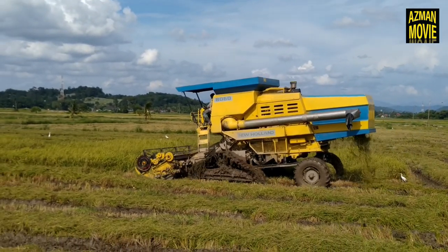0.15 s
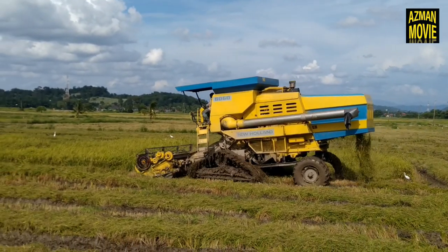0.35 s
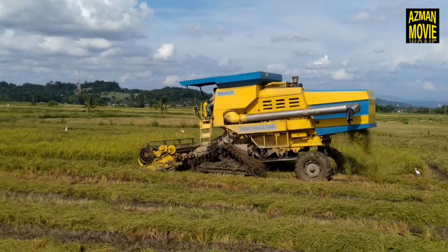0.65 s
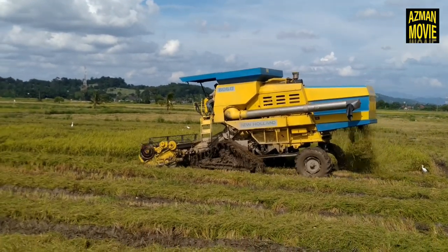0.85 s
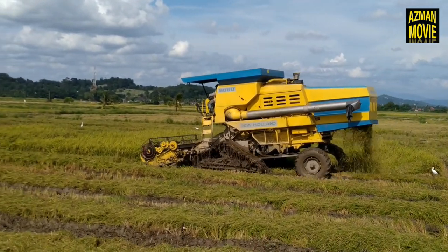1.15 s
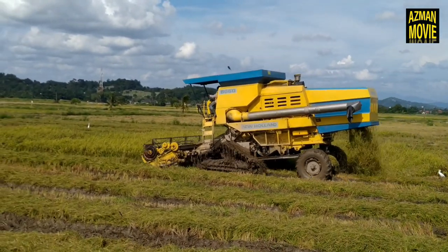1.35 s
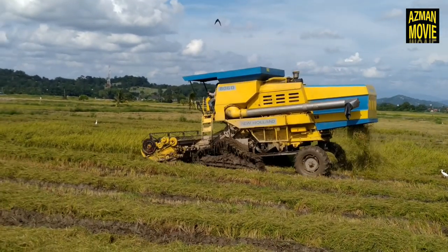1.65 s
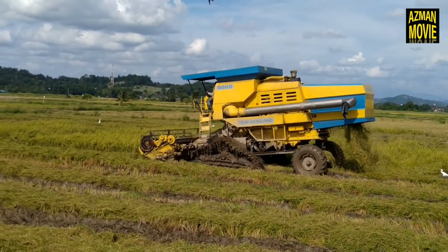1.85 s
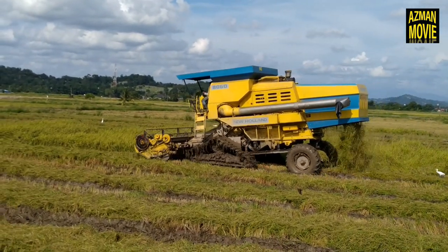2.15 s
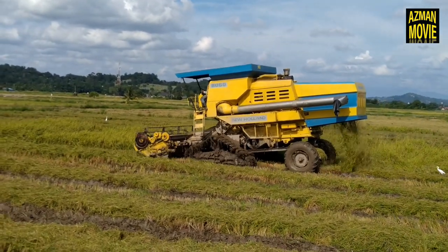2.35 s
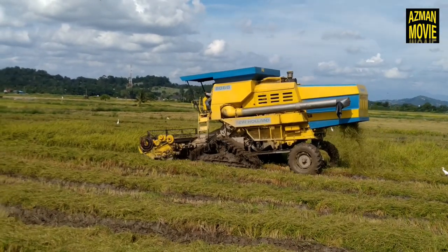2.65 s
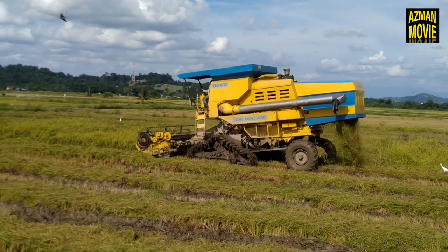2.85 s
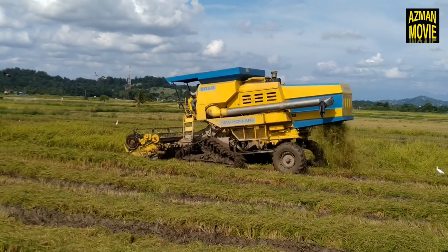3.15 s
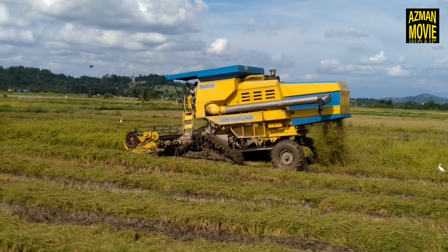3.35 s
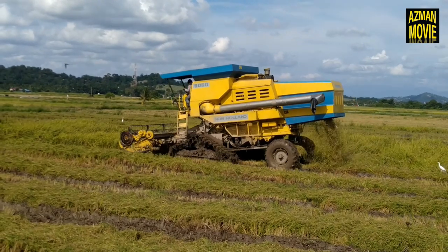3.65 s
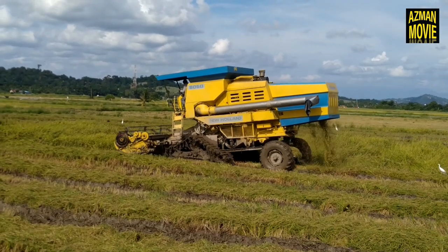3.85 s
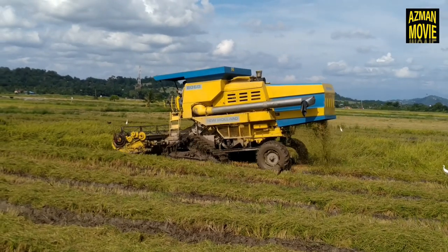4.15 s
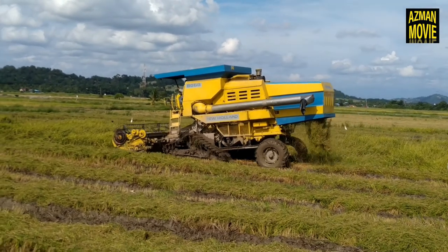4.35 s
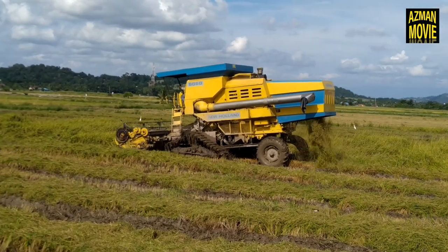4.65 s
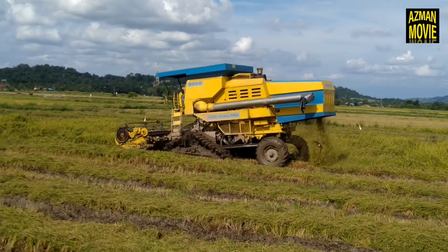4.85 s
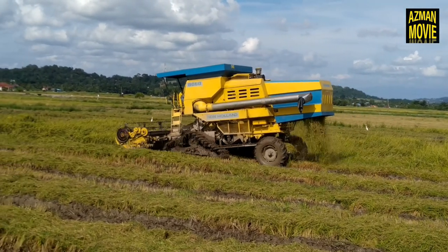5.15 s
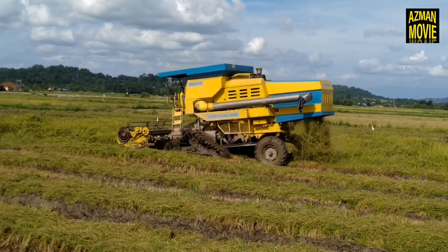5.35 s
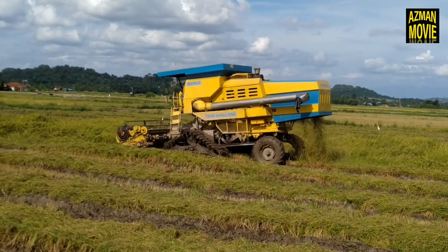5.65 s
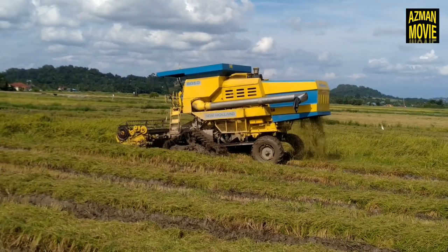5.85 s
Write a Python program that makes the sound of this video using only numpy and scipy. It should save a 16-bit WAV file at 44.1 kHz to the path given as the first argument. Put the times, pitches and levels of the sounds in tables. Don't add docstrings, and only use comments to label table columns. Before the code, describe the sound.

Continuous loaded diesel drone from a combine harvester, heard at medium distance with no walls around. Rapid firing knocks ring metal panels and blend with a rough mid-low roar that swells slightly early on, then eases. Fine, dry chaff hiss flickers on top. Low wind thumps brush the stereo microphone, with a short bump around four seconds and gusts after five.

```python
import sys
import numpy as np
from scipy import signal
from scipy.fft import rfft, irfft
from scipy.io import wavfile

SR = 44100
rng = np.random.default_rng(int(sys.argv[2]) if len(sys.argv) > 2 else 0)


def natural_amplitude(level_db):
    exponent = np.asarray(level_db, float) / 20
    return 10 ** exponent


def materialize(psi):
    bounded = np.clip(np.atleast_2d(psi).T, -1, 1)
    quanta = np.round(bounded * 32767).astype(np.int16)
    wavfile.write(sys.argv[1], SR, quanta)


N = 264600
TIME = np.arange(N) / SR
BINS_HZ = np.maximum(np.fft.rfftfreq(N, 1 / SR), 1)

VIEW_S = [.8, 2.5, 4.6]


def rms_one(x):
    return x / np.sqrt(np.mean(x ** 2) + 1e-20)


def in_time(rows):
    s, *columns = np.transpose(rows)
    return [np.interp(TIME, s, column) for column in columns]


def at_hz(points, hz):
    table_hz, value = np.transpose(points)
    return np.interp(np.log(hz), np.log(table_hz), value)


def drift(rate_hz):
    step = 40
    r = np.exp(-2 * step * np.pi * rate_hz / SR)
    white = rng.standard_normal(N // step + 2002)
    slow = signal.lfilter([1], [1, -2 * r, r * r], white)[2000:]
    return np.interp(np.arange(N) / step, np.arange(len(slow)), rms_one(slow - slow.mean()))


def swells(peaks, floor_db):
    power = natural_amplitude(2 * floor_db)
    for s, db, rise_s, fall_s in peaks:
        width_s = np.where(TIME < s, rise_s, fall_s)
        power = power + natural_amplitude(2 * db) * np.exp(-((TIME - s) / width_s) ** 2)
    return 10 * np.log10(power)


def resonance(x, hz, width_hz):
    r = np.exp(-np.pi * width_hz / SR)
    zeros = np.array([1, 0, -1]) * (1 - r * r) / 2
    poles = [1, -2 * r * np.cos(2 * np.pi * hz / SR), r * r]
    return signal.lfilter(zeros, poles, x)


def bands(x, spectrum, low_hz, high_hz, gain_db_at):
    coloured = rfft(x) * natural_amplitude(at_hz(spectrum, BINS_HZ))
    out = 0
    for hz in low_hz * 2 ** np.arange(0, np.log2(high_hz / low_hz), .5):
        window = np.cos(np.pi * np.clip(np.log2(BINS_HZ / hz), -.5, .5)) ** 2
        out = out + irfft(coloured * window, N) * natural_amplitude(gain_db_at(hz))
    return out


def ports(pair):
    # (frequency [Hz], level [dB])
    port_side = [(60, -28), (110, -22), (200, -18.5), (380, -23.5), (700, -18), (1290, -7), (2380, -7),
                 (4400, -2), (8120, 1.5), (15000, 1.5)]
    # (frequency [Hz], level difference [dB])
    port_balance = [(60, 1.5), (110, 1.0), (200, 2), (380, 0), (700, 2), (1290, -4.5), (2380, 1.5),
                    (4400, 2.5), (8120, 2.5), (15000, 10)]
    # (frequency [Hz], share [0-1])
    diffuse = [(60, .3), (300, .3), (1000, 0.55), (2500, 0.6), (5000, 0.7), (9000, .8), (15000, .9)]
    direct, scattered = rfft(pair)
    in_step = np.tanh(at_hz(port_balance, BINS_HZ) * np.log(10) / 40)
    side_power = natural_amplitude(2 * at_hz(port_side, BINS_HZ))
    rest = np.sqrt(np.maximum(side_power - in_step ** 2, 0))
    share = np.clip(at_hz(diffuse, BINS_HZ), 0, 1)
    side = (in_step + 1j * rest * np.sqrt(1 - share)) * direct + rest * np.sqrt(share) * scattered
    return irfft([direct + side, direct - side], N)


def ground_echo(x):
    # (time [s], lag [ms])
    echo_ms = [(0, 2.1), (2.5, 1.977), (6, 1.886)]
    lag_s = in_time(echo_ms)[0] / 1000
    band = signal.butter(1, [700, 3200], "band", fs=SR, output="sos")
    dull = signal.sosfiltfilt(band, x)
    return x - .5 * np.array([np.interp(TIME - lag_s, TIME, row) for row in dull])


def wind():
    # (peak time [s], peak level [dB], half length [s])
    gusts = [(.2, -41, .25), (.8, -44, .4), (1.2, -36, .08), (1.52, -37, .2), (2.0, -47, .3),
             (2.77, -45, .12), (3.13, -39, .09), (3.5, -42, .2), (4.06, -37.5, .1), (4.35, -45, .2),
             (4.72, -33, .13), (4.93, -33, .1), (5.15, -27, .14), (5.55, -40, .15), (5.71, -32, .07),
             (6.0, -29, .15)]
    # (time [s], peak level [dB], frequency [Hz])
    thumps = [
        (4.008, -19, 90),
        (4.092, -12, 150),
    ]
    calm_db, gust_dulling = -51, .6
    level_db = swells([(s, db, half_s, half_s) for s, db, half_s in gusts], calm_db)
    bright_db = -gust_dulling * (level_db - calm_db)
    white = rng.standard_normal((2, 2, N))
    low_band = signal.butter(2, [45, 120], "band", fs=SR, output="sos")
    high_band = signal.butter(2, [125, 240], "band", fs=SR, output="sos")
    low = rms_one(signal.sosfilt(low_band, white[0]))
    high = rms_one(signal.sosfilt(high_band, white[1]))
    lumps_db = 2.5 * np.array([drift(14), drift(14)])
    out = natural_amplitude(level_db + 4 + lumps_db) * (low + natural_amplitude(bright_db - 3) * high)
    for s, peak_db, hz in thumps:
        turns = (TIME - s) * hz
        out[0] += natural_amplitude(peak_db) * np.exp(-(turns / .4) ** 2) * np.sin(2 * np.pi * turns)
    return out


def grains(per_s, spread_db):
    size_db = spread_db * np.minimum(rng.exponential(1, (2, N)), 5)
    sizes = natural_amplitude(size_db) * rng.choice([-1, 1], (2, N))
    return rms_one(sizes * (rng.random((2, N)) < per_s / SR))


def chaff(gate):
    # (time [s], level [dB])
    stream = [(0, -46.5), (.7, -44.5), (1.2, -45), (1.55, -41), (1.85, -44.5), (2.1, -42.5), (2.5, -46.5),
              (3.3, -45.5), (4.5, -47), (5.0, -43.5), (5.5, -47), (6, -45)]
    # (time [s], peak level [dB])
    wads = [(0.0, -46), (.08, -51), (.15, -46), (.32, -46), (.47, -44), (.62, -43), (.77, -40.5),
            (.93, -44), (1.1, -51), (1.25, -40.5), (1.49, -50), (1.67, -43), (2.0, -42), (2.17, -46),
            (2.23, -44), (2.54, -48), (3.03, -47), (3.36, -48), (3.46, -46), (3.68, -47), (3.83, -50),
            (4.13, -40.5), (4.33, -45), (4.47, -50), (4.66, -48), (4.86, -45), (5.06, -41), (5.16, -46),
            (5.46, -44), (5.83, -47)]
    # (frequency [Hz], density [dB per Hz])
    chaff_colour = [(1500, -27), (3000, 5.5), (6000, -3), (9000, -5.5), (11200, 3.5), (13000, 0),
                    (16000, -6)]
    wad_rise_s, wad_fall_s = 0.027, 0.026
    knock = 0.27
    fine_follows = -0.21
    stream_db, = in_time(stream)
    level_db = swells([(s, db, wad_rise_s, wad_fall_s) for s, db in wads], stream_db)
    grains_per_s = 1500 * natural_amplitude(3 * drift(20))
    rustle = rng.standard_normal((2, N)) + .6 * grains(grains_per_s, spread_db=3.0)
    clump = drift(25)
    top_db = fine_follows * (stream_db - stream_db.mean())

    def moving_db(hz):
        return .8 * clump + .4 * drift(20) + top_db * (hz > 12000)

    noise = bands(rustle * (1 + knock * gate), chaff_colour, 1300, 20000, moving_db)
    return natural_amplitude(level_db + 0.5) * ports(rms_one(noise))


def roar(gate, lope_db):
    # (frequency [Hz], density [dB per Hz])
    roar_colour = [(25, -56), (42, -9), (52, -7), (70, 3), (110, -3), (170, -3), (300, -2.5), (380, -8),
                   (440, -17.5), (900, -16), (1500, -20.5), (2100, -28.5), (3300, -29.5), (4400, -42),
                   (7000, -45.5)]
    # (time [s], level [dB])
    crop_load = [(0.0, -32), (.6, -28.5), (1.2, -29), (1.8, -27), (2.3, -28.5), (2.8, -31), (4.0, -31),
                 (5.2, -31.5), (6.0, -30.5)]
    load_dulling = 1.24
    knock_low, knock_high = .5, .7
    level_db, = in_time(crop_load)
    treble_db = -load_dulling * level_db
    tilt_db = treble_db - treble_db.mean() + 0.95 * drift(5)

    def moving_db(hz):
        bright = np.clip(np.log2(hz / 700) / 2, 0, 1)
        knock = knock_low + (knock_high - knock_low) * bright
        gated_db = (20 * np.log10(1 + knock * gate) + lope_db) * (hz > 400)
        return bright * tilt_db + 0.65 * drift(4.5) + gated_db

    noise = rms_one(bands(rng.standard_normal((2, N)), roar_colour, 28, 11000, moving_db))
    return natural_amplitude(level_db + 2.5) * ports(ground_echo(noise))


def firing_gate(cycle):
    cylinder_db = [2, -1.5, 2.5, -5, -2, 0]
    rise, die, scatter_db = 0.097, 0.44, 1.5
    turns = 6 * (cycle + .9)
    shot = turns.astype(int)
    chance_db = scatter_db * rng.standard_normal(N // 100)[shot]
    strength_db = np.array(cylinder_db)[shot % 6] + chance_db
    since = turns - shot
    return rms_one(natural_amplitude(strength_db) * (1 - np.exp(-since / rise)) * np.exp(-since / die))


def body(gate, far_gate, lope_db):
    # (frequency [Hz], width [Hz], level at start, middle, end [dB], left-right [dB])
    panels = [(374, 33, -40, -40.5, -37.5, 3), (592, 105, -35.5, -36.5, -39, -4),
              (782, 195, -35, -37, -40, -2), (881, 120, -51, -49, -47, 3), (1144, 46, -38, -42.5, -63, 3),
              (1216, 124, -46, -41, -36.5, 0), (1406, 62, -38.5, -35.5, -44, -1.5),
              (1546, 176, -45, -40, -79, 10), (1770, 59, -52, -43.5, -38, 4), (1855, 58, -54, -55, -58, 37),
              (1940, 40, -56, -43, -51, -1), (2257, 156, -39.5, -39, -38.5, -1),
              (2727, 220, -49, -44, -64, 4), (3014, 130, -61, -102, -48, -5),
              (3350, 260, -52, -53, -79, -17), (3638, 147, -47.5, -50.5, -44.5, -2.5),
              (4960, 270, -60, -55.5, -52.5, 1)]
    small_panel_hz = 2000
    knock, blow_share = 1.6, 0.47
    noise = rng.standard_normal((2, N))

    def drive(firing):
        blow = rms_one(np.gradient(np.gradient(firing))) * [[1], [0]]
        return ports(noise * (1 + knock * firing) + blow_share * blow)

    near, far = drive(gate), drive(far_gate)
    out = 0
    for hz, width_hz, *angle_db, pan_db in panels:
        struck = near if hz > small_panel_hz else far
        once = resonance(struck, hz, 1.46 * width_hz)
        ring = rms_one(resonance(once, hz, 1.46 * width_hz))
        level_db = np.interp(TIME, VIEW_S, angle_db) + lope_db + 0.52 * drift(1.6) + 0.7 * drift(24)
        out = out + natural_amplitude(level_db) * ring * natural_amplitude([[pan_db / 2], [-pan_db / 2]])
    return out


def exhaust(cycle):
    # (multiple of the cycle, rms level at start, middle, end [dB])
    main_orders = [(3, -29.8, -30.5, -32.5), (6, -25.2, -21.6, -19.9), (9, -23.6, -23.6, -26)]
    mouth_s = [1.0, 2.5, 3.4]
    # (multiple of the cycle, rms level at start, middle, end [dB])
    weak_orders = [(2, -44, -45, -44), (4, -39, -40, -41), (5, -47, -53, -44), (8, -35, -37, -38),
                   (10, -28, -30, -29), (11, -42, -45, -49), (12, -33, -34, -35), (13, -35, -36, -36),
                   (15, -34, -36, -39), (16, -49, -49, -49), (17, -42, -41, -41), (18, -53, -52, -49),
                   (21, -53, -50, -52), (24, -52, -50, -50), (27, -48, -45, -46), (28, -52, -46, -48),
                   (35, -52, -51, -52)]
    wobble_db, wobble_rad = .6, .08
    orders = [(order, np.interp(TIME, mouth_s, angle_db)) for order, *angle_db in main_orders]
    orders += [(order, np.interp(TIME, VIEW_S, angle_db)) for order, *angle_db in weak_orders]
    out = 0
    for order, db in orders:
        shaky = (order / 9) ** 1.3
        pipe_rad = 5.86 * order - .049 * order ** 2 - .4
        pipe_rad -= 1.2 * (order == 10) + 2.5 * (order in (12, 13))
        phase = 2 * np.pi * order * cycle + pipe_rad + wobble_rad * shaky * drift(4.1)
        level_db = db + wobble_db * shaky * drift(6.8)
        out = out + np.sqrt(2) * natural_amplitude(level_db) * np.sin(phase)
    return out


def scene():
    # (time [s], four-stroke cycle rate [Hz])
    engine = [(0.0, 22.06), (1.0, 22.01), (1.5, 21.9), (2.0, 21.85), (2.5, 21.95), (3.0, 21.85),
              (4.0, 21.86), (4.5, 21.93), (5.0, 21.87), (5.5, 21.98), (6.0, 22.01)]
    far_bank_lag_s = 1 / 65.8
    cycle_hz, = in_time(engine)
    cycle = np.cumsum(cycle_hz * (1 + .0006 * drift(3))) / SR
    gate = firing_gate(cycle)
    far_gate = np.roll(gate, int(far_bank_lag_s * SR))
    lope_db = 1.4 * np.cos(2 * np.pi * (cycle - .98))
    machine = chaff(far_gate) + roar(far_gate, lope_db) + body(gate, far_gate, lope_db)
    hum = ports(exhaust(cycle) * [[1], [0]])
    return wind() + machine + hum


def top_cut(x):
    return signal.sosfilt(signal.butter(12, 15860, fs=SR, output="sos"), x)


def record(dry):
    notch_hz, notch_width_hz, notch_db = 8250, 1220, -11
    notched = dry - (1 - natural_amplitude(notch_db)) * resonance(dry, notch_hz, notch_width_hz)
    notched = notched - .5 * resonance(notched, 7430, 1900)
    high_pass = signal.butter(3, 38, "high", fs=SR, output="sos")
    cut = signal.sosfilt(high_pass, notched)
    mix = 0.64 * np.tanh(cut / 0.59)
    return top_cut(mix)


dry = scene()
out = record(dry)
materialize(out)
```